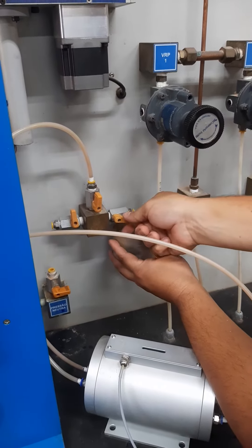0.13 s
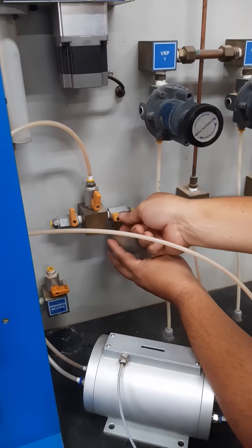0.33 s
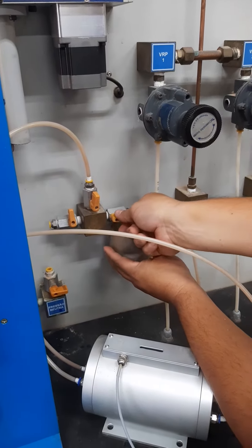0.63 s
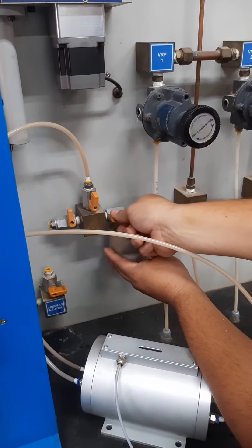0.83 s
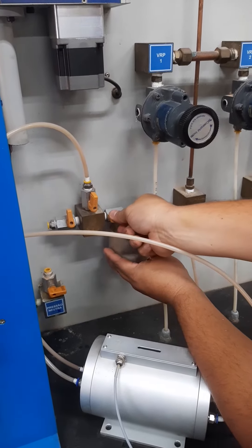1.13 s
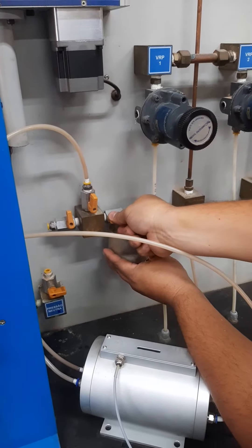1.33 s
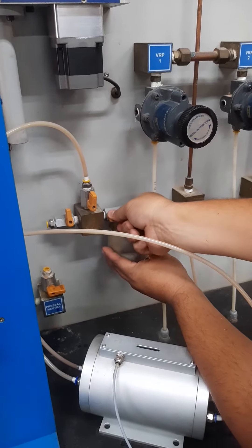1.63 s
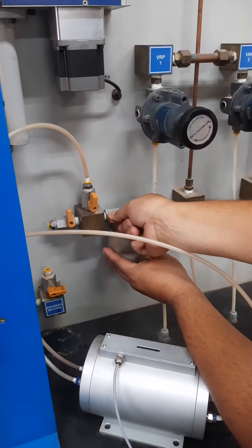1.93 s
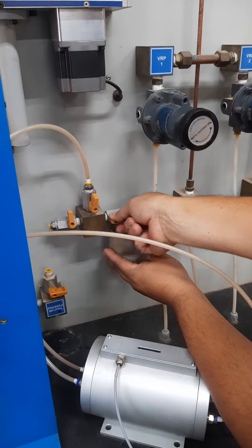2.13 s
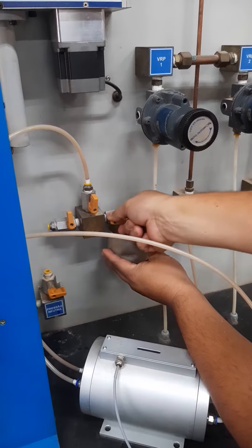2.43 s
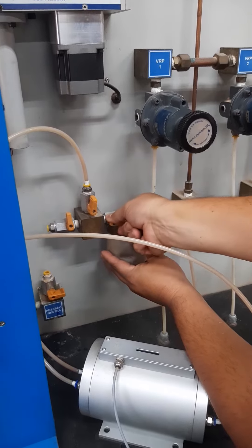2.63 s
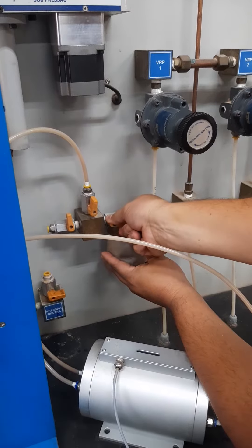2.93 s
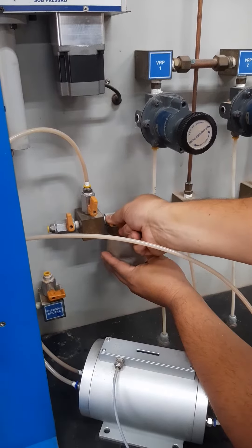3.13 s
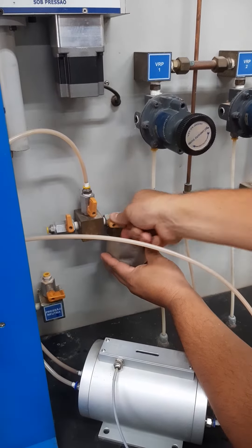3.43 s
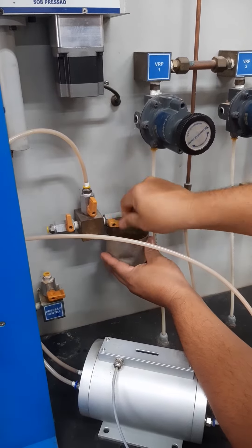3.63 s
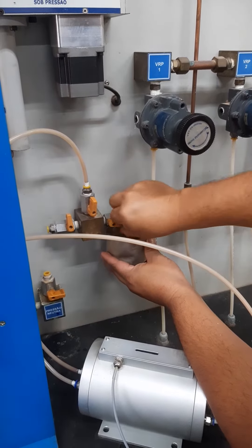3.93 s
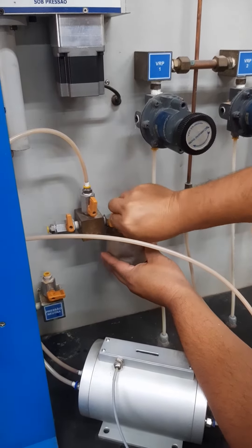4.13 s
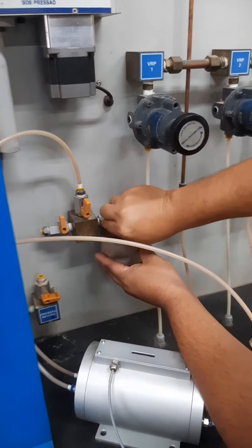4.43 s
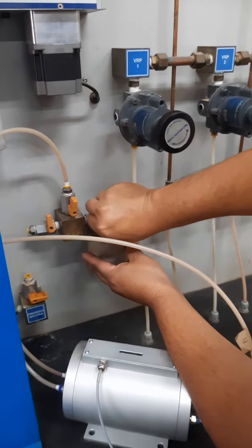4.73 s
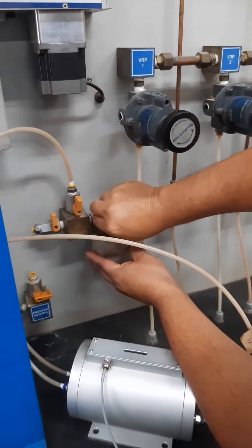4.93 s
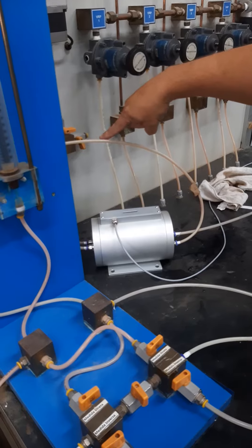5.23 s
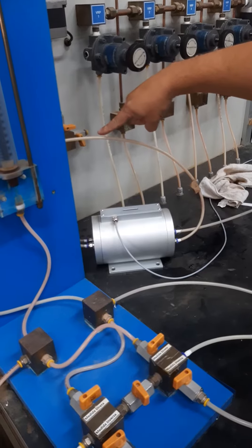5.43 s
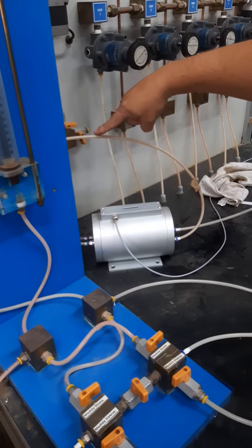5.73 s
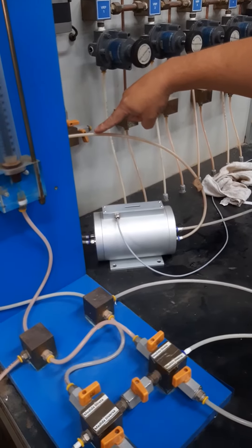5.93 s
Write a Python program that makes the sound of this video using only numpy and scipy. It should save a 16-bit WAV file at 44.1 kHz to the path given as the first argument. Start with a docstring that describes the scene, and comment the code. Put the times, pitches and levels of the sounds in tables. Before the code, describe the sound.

In a laboratory, motors hum and throb over ventilation noise, with a hollow duct tone and thin, high gas hiss. A gas line sputters with soft, irregular pops. After about four seconds a hand rustles at a small valve close to the microphone, and the handle clicks and snaps against its metal stop. Gas sings faintly as the sputter fades. The whistles then sound more distant, with a soft cloth swish and a brief scuff.

```python
"""Motors hum and throb over ventilation noise, and gas hisses and whistles thinly in a laboratory panel.
Turbulence excites the whistles in ducts and fittings, and the hiss thrown back off a wall is coloured high up;
the line sputters with soft pops that ring its tubing. A hand rustles at a small valve. The handle knocks,
clicks and snaps against its stop, and gas sings in the pipe as the sputter dies away. Then the listener is a
step further back, where the whistles are fainter; cloth swishes and something scuffs briefly."""
import sys
import numpy as np
from scipy import signal
from scipy.fft import rfft, irfft
from scipy.io import wavfile

SR = 44100
rng = np.random.default_rng(int(sys.argv[2]) if len(sys.argv) > 2 else 0)


def transcribe(u):
    """Save the signal u as a 16-bit wav file named by the first command-line argument.

    u: samples, shape (n,) or (channels, n), limited to [-1, 1]; the rate is SR.
    q: integer samples, one column per channel.
    """
    v = np.clip(np.atleast_2d(u).T, -1, 1)
    q = np.round(v * 32767).astype(np.int16)
    wavfile.write(sys.argv[1], SR, q)


N = 267510
TIME = np.arange(N) / SR
HIT_TIME = TIME[:SR // 10]
FREQS = np.maximum(np.arange(N // 2 + 1) * SR / N, 1)
STEP_BACK_S = 5.14


def from_db(db):
    """Decibels to gain."""
    return 10 ** (np.asarray(db) / 20)


def rms_one(x):
    """Scale to unit rms."""
    return x / np.sqrt(np.mean(x ** 2) + 1e-20)


def over_freqs(points):
    """Interpolate (Hz, value) points on a log-frequency axis."""
    hz, value = np.transpose(points)
    return np.interp(np.log(FREQS), np.log(hz), value)


def pan(balance_db):
    """Constant-power ear gains; balance is left minus right."""
    gains = from_db(np.array([[1], [-1]]) * balance_db / 2)
    return gains / np.sqrt(np.mean(gains ** 2, axis=0))


def drift(rate_hz):
    """Smooth random wander, unit rms."""
    return rms_one(irfft(rfft(rng.standard_normal(N)) / (1 + (FREQS / rate_hz) ** 2) ** 2, N))


def envelope(onset_s, hold_s, attack_s, fall_db_per_s):
    """Reach 1 at the onset, hold, then fall evenly in dB."""
    rise = np.clip(1 + (TIME - onset_s) / attack_s, 0, 1)
    return rise * from_db(-fall_db_per_s * np.maximum(TIME - onset_s - hold_s, 0))


def further_back(change_db):
    """Gain that sets in as the listener steps back."""
    return from_db(change_db * np.clip((TIME - STEP_BACK_S) / .02, 0, 1))


def ring(hz, t60_s):
    """A struck mode: a decaying sine."""
    return np.sin(2 * np.pi * hz * HIT_TIME) * from_db(-60 * HIT_TIME / t60_s)


def butter(x, order, hz, kind="low"):
    """Butterworth filter."""
    return signal.sosfilt(signal.butter(order, hz, kind, fs=SR, output="sos"), x)


def add(out, start_s, sound):
    """Mix in a short sound."""
    start = round(start_s * SR)
    out[:, start:start + sound.shape[-1]] += sound[..., :N - start]


# Likeness of the ears. Each row: frequency in Hz, correlation before the phase twist.
EAR_LIKENESS = [(88, 0.5), (110, 0.4), (200, 0.83), (380, 0.64), (700, 0.34), (1300, 0), (2400, 0.18),
                (4100, 0.9), (15000, 0)]

def diffuse(gain, twist_from_hz=1000, twist_step_hz=300):
    """Stereo noise, gain per root Hz; echoes off the panel twist the treble phase between the ears."""
    alike = over_freqs(EAR_LIKENESS)
    mid, side = rfft(rng.standard_normal((2, N)))
    ears = np.sqrt(1 + alike) * mid + np.sqrt(1 - alike) * side * [[1], [-1]]
    steps_hz = np.arange(twist_from_hz, SR / 2, twist_step_hz)
    twist_rad = np.interp(FREQS, steps_hz, np.cumsum(rng.standard_normal(len(steps_hz))), left=0)
    ears[1] *= np.exp(1j * twist_rad)
    return irfft(ears * gain, N) * np.sqrt(SR) / 2


def resonant_noise(hz, width_hz):
    """Noise through a doubled resonance, unit rms."""
    detune = (FREQS ** 2 - hz ** 2) / (FREQS * width_hz)
    return rms_one(diffuse(1 / (1 + detune ** 2)))


def throb(shaft_hz=57.06, beat_hz=0.59, in_step_s=2.51, strong_db=-52.5, weak_db=-56.5):
    """Two shafts at nearly the same speed beat, so their deep hum swells and sinks."""
    ear_phase_rad = np.array([[0], [1]])
    carrier = 2 * np.pi * (shaft_hz * TIME + rng.random()) + ear_phase_rad
    apart = np.pi * beat_hz * (TIME - in_step_s)
    pair = from_db(strong_db) * np.sin(carrier - apart) + from_db(weak_db) * np.sin(carrier + apart)
    return np.sqrt(2) * pair * pan(1) * further_back(-6.5)


# Each row: frequency in Hz, rms level in dB, balance in dB.
MOTOR_TONES = [(97.1, -58.5, 6), (114.95, -52.5, 7.5), (119.64, -49, 1.5), (157.4, -56.5, 4),
               (171.5, -59.5, 3), (190.3, -62.5, 2), (206.3, -58.5, -3), (239.7, -63, 6), (258.5, -60.5, 3),
               (291.8, -59, -12), (360.1, -60, -2)]

def motors(waver_hz=1.03, waver_rad=0.29, waver_db=2.0):
    """Fan and mains tones, wavering in the room."""
    out = 0
    for hz, level_db, balance_db in MOTOR_TONES:
        phase = 2 * np.pi * (hz * TIME + rng.random()) + waver_rad * drift(waver_hz)
        tone = rms_one(np.sin(phase) * from_db(waver_db * drift(waver_hz)))
        out += tone * from_db(level_db) * pan(balance_db)
    return out


# Each row: frequency in Hz, density in dB per Hz.
VENT_SPECTRUM = [(25, -99), (42, -79.5), (68, -74.5), (98, -64.5), (138, -68.5), (165, -67), (225, -69.5),
                 (290, -69.5), (390, -77), (620, -80.5), (830, -80), (1000, -84.5), (2000, -92.5),
                 (3200, -112)]
HISS_SPECTRUM = [(2000, -112), (2800, -105), (3300, -101.5), (4400, -103), (5200, -109), (5950, -102),
                 (6500, -109), (7600, -95), (8300, -94.5), (8700, -101), (9300, -93), (10300, -97.5),
                 (11300, -89), (11900, -90), (13100, -87), (14300, -84.5), (15000, -87), (15600, -85)]
# Each row: frequency in Hz, balance in dB.
AIR_BALANCE = [(55, 10), (100, 3.5), (150, 4.5), (230, -1), (290, 0.5), (400, 2), (750, 3), (1100, -2),
               (4000, 3.5), (7600, -0.5), (9400, 2), (11800, 0.5), (13000, 3), (14800, -2)]

def air():
    """Steady ventilation rumble, and gas hiss that is weaker from further back."""
    ears = pan(over_freqs(AIR_BALANCE))
    vent = diffuse(from_db(over_freqs(VENT_SPECTRUM)) * ears)
    hiss = diffuse(from_db(over_freqs(HISS_SPECTRUM)) * ears)
    return vent + hiss * further_back(-2.1)


# Each row: frequency in Hz, width in Hz, rms level in dB, balance in dB, change further back in dB.
WHISTLE_BANDS = [(504.5, 88, -51, 5, -5), (497, 18, -54.5, 9, -11), (514, 17, -55, 11.5, -14),
                 (3790, 220, -72.5, -9, -6), (4110, 340, -63.5, -0.5, -3.5), (4400, 300, -73, 1, -2),
                 (7800, 150, -65.5, -18, -4.5), (8300, 140, -65.5, 12, -6), (10800, 280, -63, 5, -6),
                 (12680, 820, -58.5, 6, 0), (13300, 290, -73, 13, -7), (14860, 330, -63, 4, -3)]

def whistles(waver_db=1.02, waver_hz=2.7):
    """Turbulence keeps narrow resonances singing in ducts and fittings; the bands above 12 kHz colour the hiss
    where it comes back off a wall."""
    out = 0
    for hz, width_hz, level_db, balance_db, far_db in WHISTLE_BANDS:
        gain = from_db(level_db + waver_db * drift(waver_hz)) * further_back(far_db)
        out += gain * pan(balance_db) * resonant_noise(hz, width_hz)
    return out


# Each row: onset in seconds, hold in seconds, rms level in dB.
LEAK_SPELLS = [(0.0, 0.15, -56.5), (0.55, 0.13, -59), (0.81, .15, -57), (3.93, 0.058, -52),
               (4.337, 0.41, -58.5), (4.934, 0.079, -56.5)]

def leak(hz=10985, width_hz=51):
    """A thin whistle at a leaking fitting catches in spells."""
    spells = sum(from_db(level_db) * envelope(onset_s, hold_s, attack_s=0.035, fall_db_per_s=113)
                 for onset_s, hold_s, level_db in LEAK_SPELLS)
    return spells * pan(2) * resonant_noise(hz, width_hz)


# Each row: onset in seconds, hold in seconds, rms level in dB, frequency in Hz, width in Hz,
# balance in dB.
BRIEF_TONES = [(0.0, 0.12, -65, 5080, 160, 8), (0.093, 0.25, -54, 810, 110, 1),
               (0.165, 0.16, -53.5, 1146, 170, -3), (0.475, 0.032, -43.5, 278, 30, 0),
               (3.096, 0.41, -47, 254, 48.7, 0)]

def brief_tones():
    """Faint, breathy tones that each swell once and fade."""
    out = 0
    for onset_s, hold_s, level_db, hz, width_hz, balance_db in BRIEF_TONES:
        swell = envelope(onset_s, hold_s, attack_s=0.035, fall_db_per_s=67)
        out += swell * from_db(level_db) * pan(balance_db) * resonant_noise(hz, width_hz)
    return out


def sputter_loss_db(time_s, fade_from_s=4.02, fall_db_per_s=11):
    """How far the sputter has died away."""
    return fall_db_per_s * np.maximum(time_s - fade_from_s, 0)


# Each row: frequency in Hz, relative level in dB.
SPUTTER_SPECTRUM = [(700, -100), (1100, -83.5), (1500, -83), (2050, -81.5), (2250, -100.5), (2500, -115)]

def sputter(gain_db=-5, lump_db=2.5, lump_hz=40):
    """A lumpy fizz in the gas line."""
    strength_db = gain_db - sputter_loss_db(TIME) + lump_db * drift(lump_hz)
    return diffuse(from_db(over_freqs(SPUTTER_SPECTRUM))) * from_db(strength_db) * pan(-11)


def faint_pops(lowest_hz, range_octaves=0.49, per_s=4, count=40, mean_db=-51.5, spread_db=2):
    """Rows for weak pops at uneven intervals, mostly low in pitch, fading with the sputter."""
    jitter, pitch = rng.random((count, 2)).T
    start_s = (np.arange(count) + jitter) / per_s
    level_db = mean_db + spread_db * rng.standard_normal(count) - sputter_loss_db(start_s)
    hz = lowest_hz * 2 ** (range_octaves * pitch ** 2)
    return list(zip(start_s, level_db, hz))


# Each row: time in seconds, relative level in dB, pitch in Hz.
LOUD_POPS = [(0.263, -35, 1500), (0.2925, -35.5, 1740), (0.38, -37.5, 1400), (0.7976, -39, 1340),
             (0.8185, -41, 1300), (0.8894, -37.5, 1830), (0.9428, -38, 1290), (0.9752, -38, 1360),
             (1.1278, -39, 1230), (1.1662, -41.5, 1260), (1.3513, -48, 1260), (1.476, -33.5, 1360),
             (1.6122, -39, 1860), (1.698, -35, 1870), (1.7605, -29.5, 2050), (1.764, -37.5, 1300),
             (1.7918, -36, 1520), (1.8836, -38, 1240), (1.9829, -41, 1550), (2.2223, -36, 1444),
             (2.2757, -36, 1710), (2.393, -41, 1190), (2.7761, -39, 1390), (2.9153, -38.5, 1240),
             (2.9636, -36, 1240), (3.0979, -42, 1300), (3.2715, -41, 1370), (3.3204, -41, 1870),
             (3.3982, -36, 1300), (3.4797, -32, 1295), (3.8082, -36.5, 1420), (4.043, -36, 1550),
             (4.4010, -32.5, 1420), (5.3234, -43, 1730)]
# Each row: frequency in Hz, relative level in dB, t60 in seconds.
TUBE_MODES = [(1300, -25, 0.025), (1457, -6, 0.03), (1760, -4, 0.024), (2270, -7, 0.013)]

def pops(base_hz=1240, gain_db=2.5, swell_s=0.003, swell_ref_db=-37, muffle_hz=2120):
    """Each pop in the line rings at its own pitch and shakes the soft tubing, which muffles it."""
    out = np.zeros((2, N))
    for time_s, level_db, hz in list(LOUD_POPS) + faint_pops(base_hz):
        strengths = rng.standard_normal(len(TUBE_MODES))
        tube = sum(strength * from_db(mode_db) * ring(mode_hz, t60_s)
                   for strength, (mode_hz, mode_db, t60_s) in zip(strengths, TUBE_MODES))
        balance_db = -7.5 - 17 * np.log2(hz / base_hz)  # higher pops lie further right
        rise_s = swell_s * from_db(swell_ref_db - level_db)  # weaker pops swell more slowly
        pop = (1 - np.exp(-HIT_TIME / rise_s)) * (ring(hz, t60_s=0.033) + tube)
        if swell_s < time_s < TIME[-1]:
            add(out, time_s - swell_s / 2, from_db(level_db + gain_db) * pop * pan(balance_db))
    return butter(out, 10, muffle_hz)


# Each row: frequency in Hz, relative level in dB.
RUSTLE_SPECTRUM = [(1500, -108), (2400, -101), (3200, -104), (4600, -99.5), (6500, -99.5), (9000, -106)]
# Each row: onset in seconds, attack in seconds, hold in seconds, gain in dB.
ARM_MOVES = [(0.274, 0.024, 0.025, 0), (3.715, 0.024, 0.033, -6), (4.36, 0.033, 0.64, 1.5),
             (5.14, 0.032, 0.11, -3), (5.618, 0.11, 0.041, 7.5)]

def rustle():
    """Soft, even noise at each move of the hand and arm."""
    motion = sum(from_db(gain_db) * envelope(onset_s, hold_s, attack_s, fall_db_per_s=50)
                 for onset_s, attack_s, hold_s, gain_db in ARM_MOVES)
    return diffuse(from_db(over_freqs(RUSTLE_SPECTRUM))) * motion


# Each row: start in seconds, level in dB, pitch in Hz, t60 in seconds.
HANDLE_KNOCKS = [(0.2925, -36, 480, 0.011), (4.36, -29, 330, 0.025), (4.3764, -19, 456, 0.0077),
                 (4.3808, -28, 280, 0.0094)]

def knocks():
    """The handle knocks dully, one damped mode each time."""
    out = np.zeros((2, N))
    for start_s, level_db, hz, t60_s in HANDLE_KNOCKS:
        add(out, start_s, from_db(level_db) * ring(hz, t60_s) * pan(-15))
    return out


# Each row: start in seconds, length in seconds, level in dB, low and high edge in Hz, balance in dB.
METAL_SLIPS = [ (0.2925, 0.0055, -45, 1500, 7500, -4), (1.136, 0.007, -50, 5400, 8500, -6),
               (4.3814, 0.0015, -37, 1400, 4000, -20), ]

def slips():
    """Fittings slip under the fingers, metal on metal: milliseconds of bright grit."""
    out = np.zeros((2, N))
    for start_s, length_s, level_db, low_hz, high_hz, balance_db in METAL_SLIPS:
        noise = rng.standard_normal((2, len(HIT_TIME)))
        grit = rms_one(butter(noise, 2, [low_hz, high_hz], "band"))
        gate = np.exp(-(HIT_TIME / length_s) ** 4)
        add(out, start_s, from_db(level_db) * grit * gate * pan(balance_db))
    return out


# Each row: start in seconds, gain in dB, extra crack gain in dB, top edge in Hz, balance in dB.
VALVE_CLICKS = [ (4.3596, -20, -1, 5200, -25), (4.3651, -20, -13, 3600, -25), (4.3829, -20, -8, 4200, -25),
                (4.3923, -20, -16, 2600, -29), (4.446, -26.5, -16, 3200, -27),
                (4.495, -34, 10.5, 5200, -25), (4.565, -36, 14, 4800, -21), ]
# Each row: frequency in Hz, relative level in dB, t60 in seconds.
VALVE_MODES = [(2000, -7, 0.01), (2210, -13.5, 0.025), (3200, -7, 0.0024), (4050, -14, 0.01),
               (5800, -19, 0.011)]

def valve_clicks(contact_db=2.0, rattle_s=0.0006, crack_gain=0.25):
    """The valve catches: a contact cracks and rattles, and the body rings, duller for softer contacts."""
    out = np.zeros((2, N))
    body = sum(from_db(mode_db) * ring(hz, t60_s) for hz, mode_db, t60_s in VALVE_MODES)
    contact = from_db(contact_db) * (HIT_TIME == 0)
    for start_s, gain_db, crack_db, top_hz, balance_db in VALVE_CLICKS:
        rattle = rng.standard_normal(len(HIT_TIME)) * np.exp(-HIT_TIME / rattle_s)
        crack = crack_gain * butter(contact + rattle, 2, [0.15 * top_hz, top_hz], "band")
        click = butter(body, 2, top_hz) + from_db(crack_db) * crack
        add(out, start_s, from_db(gain_db) * click * pan(balance_db))
    return out


# Each row: frequency in Hz, relative level in dB.
CRUNCH_SPECTRUM = [(600, -10), (1500, -2), (2800, 1), (4200, -1), (6000, -9), (8500, -13), (11000, -10),
                   (13000, 1), (15500, 6), (16500, -20)]

def snap(start_s=4.3829, blow_db=-11, rebound_s=0.00057, rebound_db=-4, crunch_db=-20, crunch_s=0.0011):
    """The handle hits its metal stop: a hard push, one rebound and a bright, dead crunch."""
    out, push = np.zeros((2, N)), np.zeros(len(HIT_TIME))
    push[0] = 1
    push[round(rebound_s * SR)] = -from_db(rebound_db)
    blow = butter(push, 1, [300, 2800], "band")
    grit = rms_one(irfft(rfft(rng.standard_normal(N)) * from_db(over_freqs(CRUNCH_SPECTRUM)), N))
    crunch = grit[:len(HIT_TIME)] * np.exp(-HIT_TIME / crunch_s)
    hit = from_db(blow_db) * blow / blow.max() + from_db(crunch_db) * crunch
    add(out, start_s, hit * pan(-22) / np.sqrt(2))
    return out


# Each row: frequency in Hz, width in Hz, rms level in dB, balance in dB.
FLOW_TONES = [(507, 61, -52, 1), (4210, 260, -65, -4), (8250, 210, -58.5, 0)]

def gas_flow(onset_s=4.51):
    """Once the valve is over, gas drones and sings in the pipe, heard until the step back."""
    flow = envelope(onset_s, STEP_BACK_S - onset_s, attack_s=0.035, fall_db_per_s=797)
    return flow * sum(from_db(level_db) * pan(balance_db) * resonant_noise(hz, width_hz)
                      for hz, width_hz, level_db, balance_db in FLOW_TONES)


# Each row: frequency in Hz, relative level in dB.
SWISH_SPECTRUM = [(450, -100), (620, -69), (780, -70), (950, -85), (1200, -76.5), (1800, -100)]

def swish(gain_db=-1):
    """A dull sweep of cloth as the arm swings away."""
    sweep = from_db(gain_db) * envelope(onset_s=5.15, hold_s=0, attack_s=0.04, fall_db_per_s=40)
    return diffuse(from_db(over_freqs(SWISH_SPECTRUM))) * sweep


# Each row: multiple of the pitch, width in Hz, relative level in dB.
SCUFF_MODES = [(1.002, 190, 3), (1.9, 450, -8.5)]

def scuff(onset_s=5.586, level_db=-46, start_hz=2068, rest_hz=1767, sink_s=0.045, grain_db=2.5):
    """Grainy friction excites two resonances that sink as the rub slows."""
    pitch_hz = rest_hz + (start_hz - rest_hz) * np.exp(-np.maximum(TIME - onset_s, 0) / sink_s)
    phase = 2 * np.pi * np.cumsum(pitch_hz) / SR
    pressure = from_db(level_db) * envelope(onset_s, hold_s=0, attack_s=0.02, fall_db_per_s=100)
    rub = 0
    for multiple, width_hz, mode_db in SCUFF_MODES:
        spectrum = rfft(rng.standard_normal((2, N))) / (1 + (FREQS / width_hz) ** 2)
        friction = rms_one(irfft(spectrum, N))
        rub += from_db(mode_db) * np.sqrt(2) * friction * np.sin(multiple * phase)
    return rub * pressure * from_db(grain_db * drift(rate_hz=120))


def room(x, t60_s=0.24, gap_s=0.004, wall_hz=4000):
    """A dense, dull tail from hard walls, different at each ear."""
    t = TIME[:SR // 2]
    tail = rng.standard_normal((2, len(t))) * from_db(-60 * t / t60_s) * (t > gap_s)
    response = rms_one(butter(tail, 1, wall_hz)) / np.sqrt(len(t))
    return signal.fftconvolve(x.mean(axis=0)[None], response, axes=1)[:, :N]


def scene(soft_room_db=-13, valve_room_db=-19):
    """Steady equipment all around; the soft sounds get a little room, the valve hardly any."""
    soft = sputter() + pops() + rustle() + scuff() + swish()
    valve = knocks() + valve_clicks() + snap() + slips()
    walls = room(from_db(soft_room_db) * soft + from_db(valve_room_db) * valve)
    steady = throb() + motors() + air() + whistles()
    passing = leak() + gas_flow() + brief_tones()
    return steady + passing + soft + valve + walls


def record(dry, low_cut_hz=35, high_cut_hz=15730):
    """The deepest bass is removed; the recorder cuts the top steeply."""
    thinned = butter(dry, 3, low_cut_hz, "high")
    return signal.sosfilt(signal.ellip(12, .1, 80, high_cut_hz, fs=SR, output="sos"), thinned)


dry = scene()
out = record(dry)
transcribe(out)
```